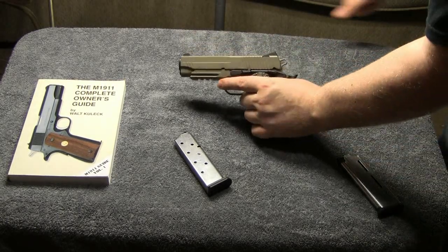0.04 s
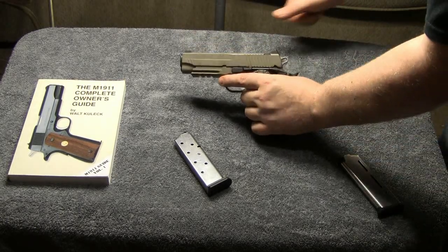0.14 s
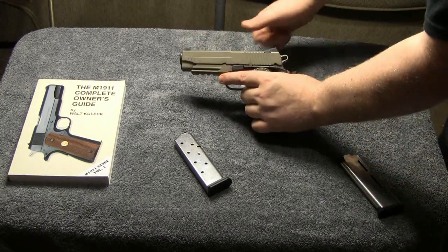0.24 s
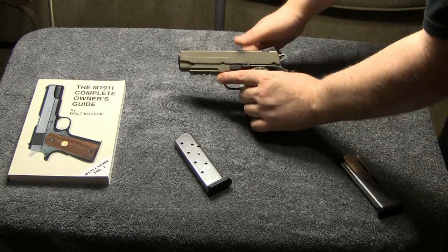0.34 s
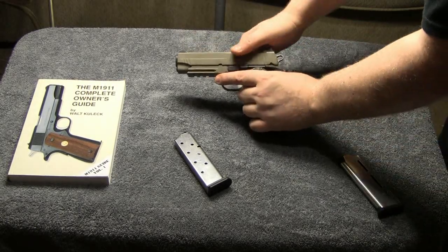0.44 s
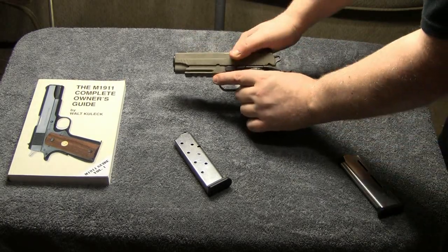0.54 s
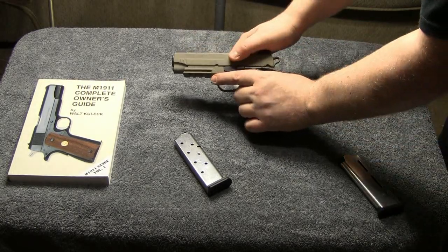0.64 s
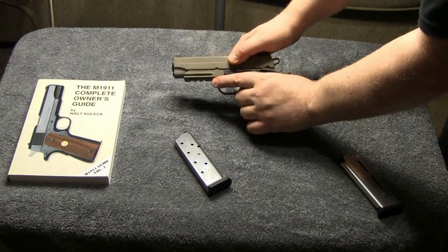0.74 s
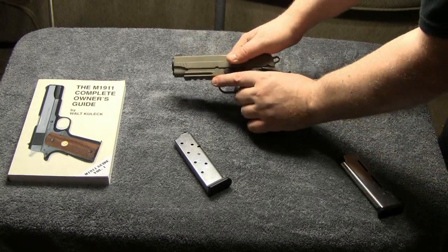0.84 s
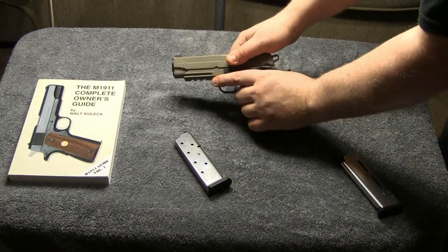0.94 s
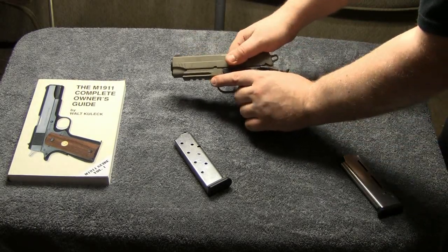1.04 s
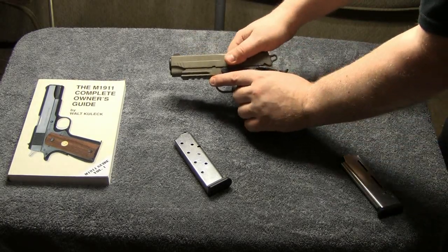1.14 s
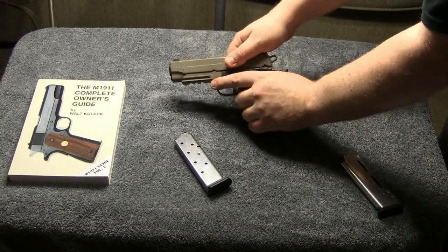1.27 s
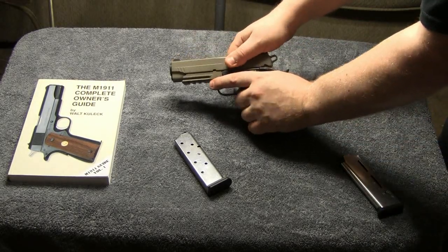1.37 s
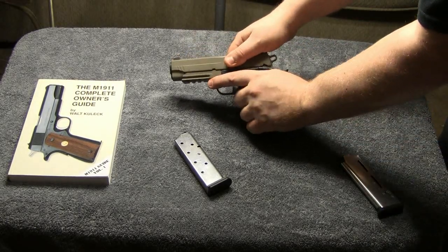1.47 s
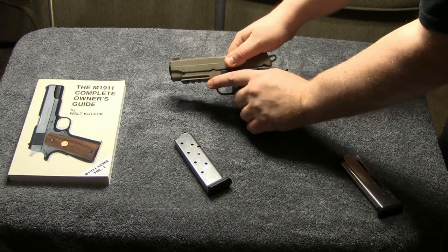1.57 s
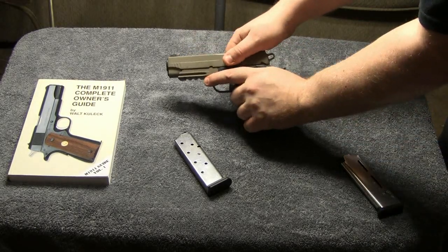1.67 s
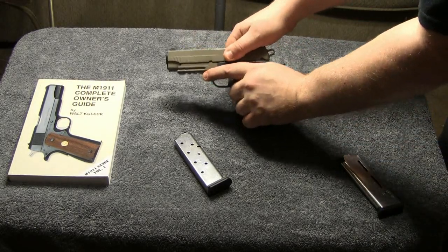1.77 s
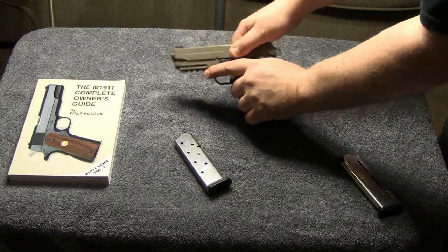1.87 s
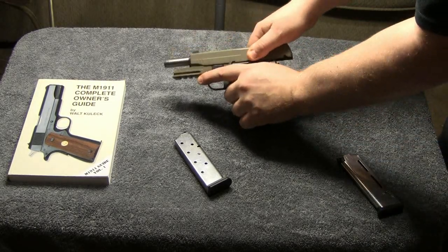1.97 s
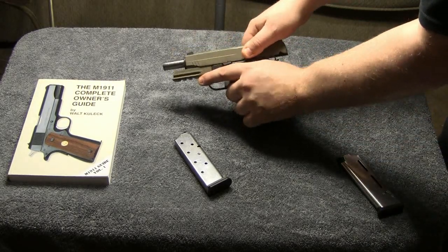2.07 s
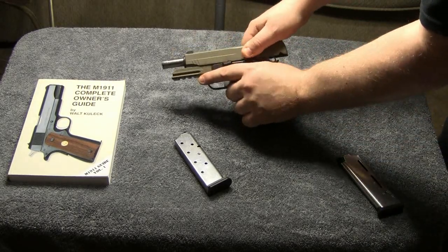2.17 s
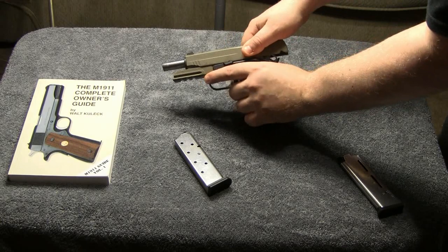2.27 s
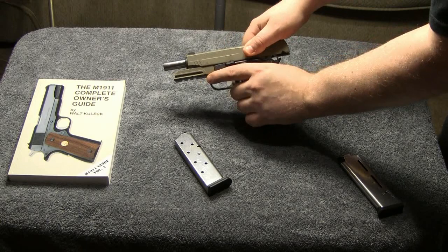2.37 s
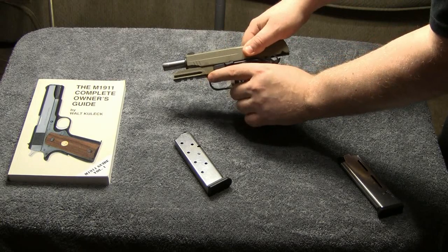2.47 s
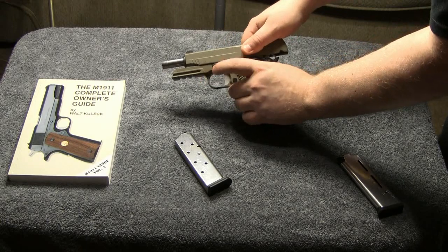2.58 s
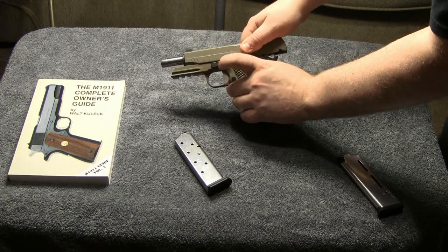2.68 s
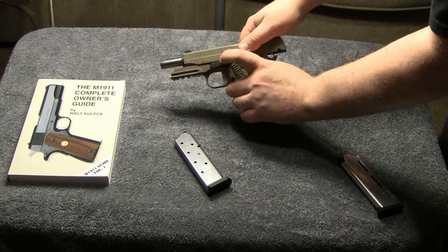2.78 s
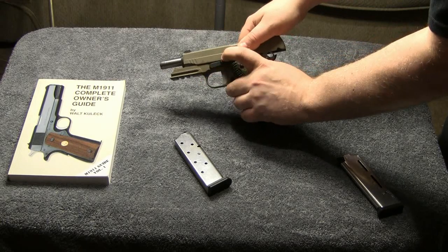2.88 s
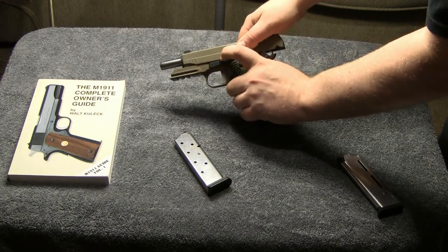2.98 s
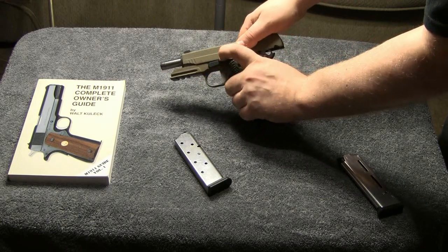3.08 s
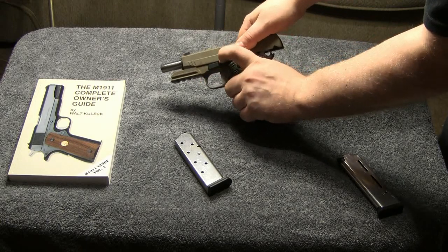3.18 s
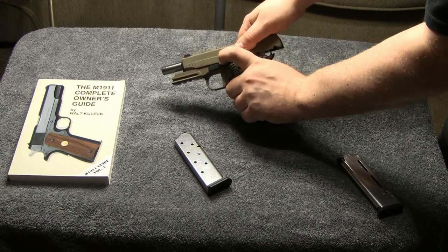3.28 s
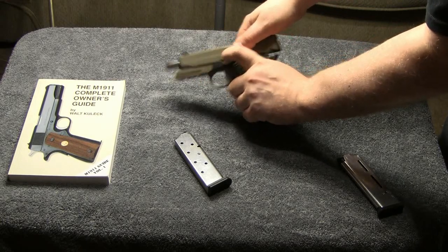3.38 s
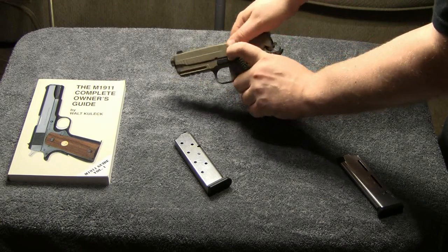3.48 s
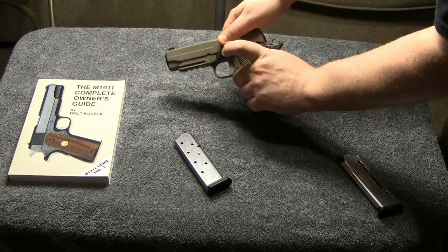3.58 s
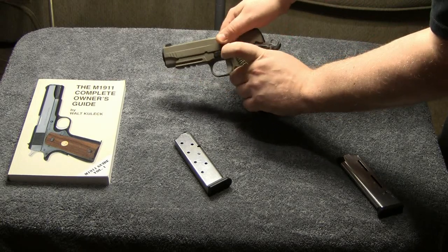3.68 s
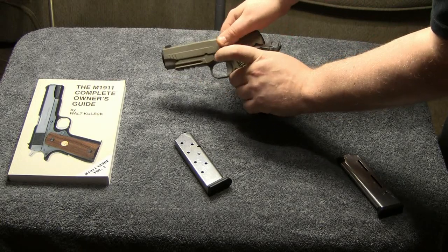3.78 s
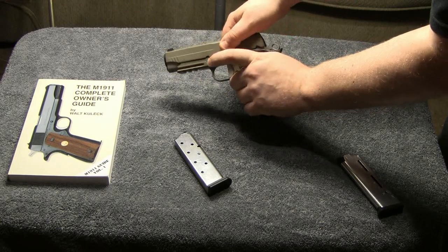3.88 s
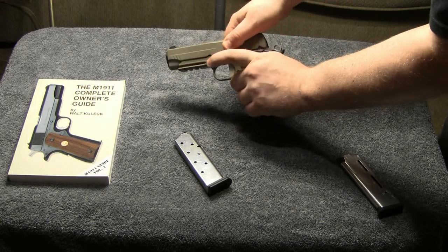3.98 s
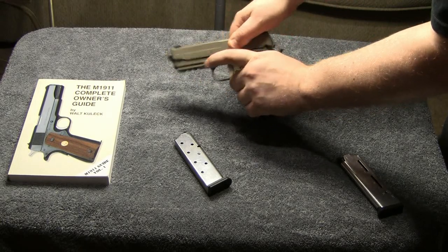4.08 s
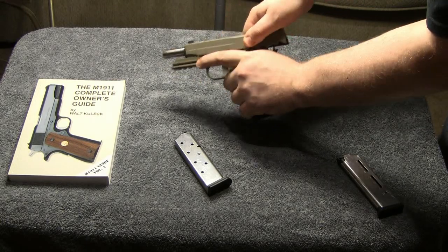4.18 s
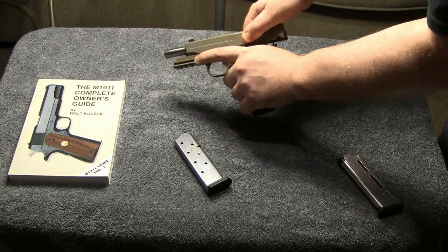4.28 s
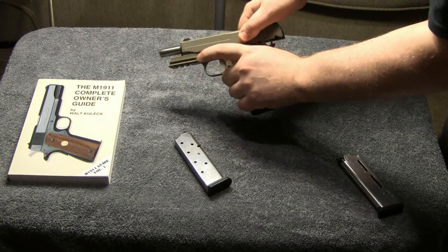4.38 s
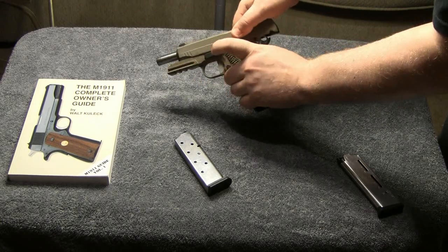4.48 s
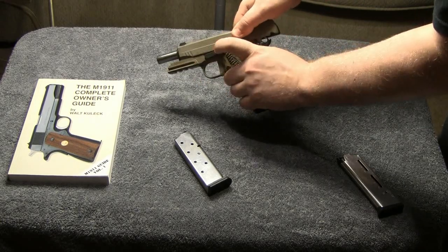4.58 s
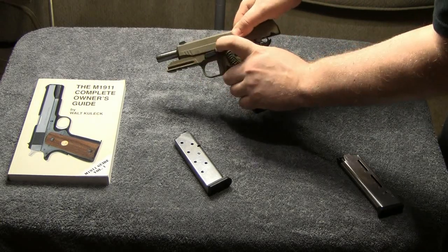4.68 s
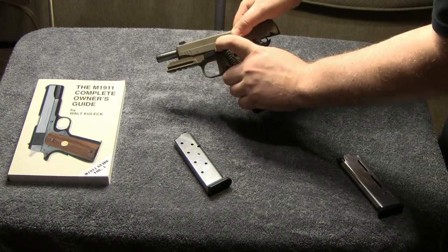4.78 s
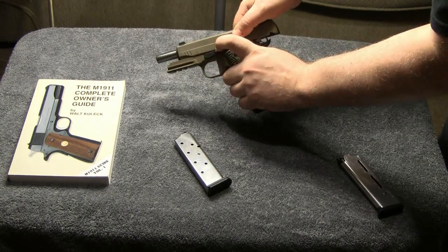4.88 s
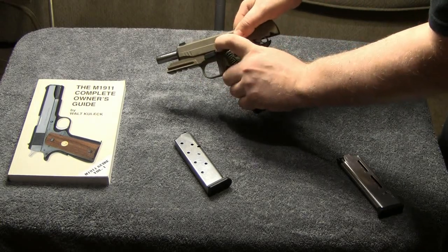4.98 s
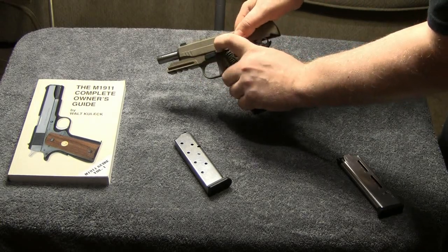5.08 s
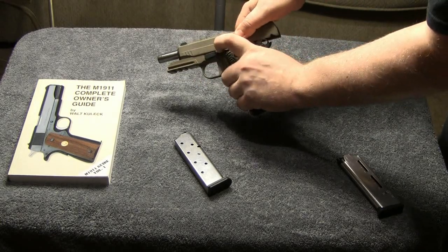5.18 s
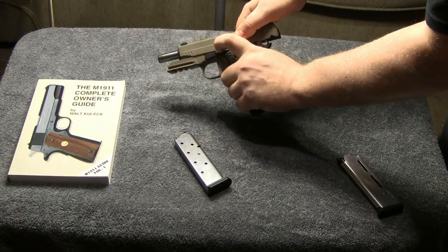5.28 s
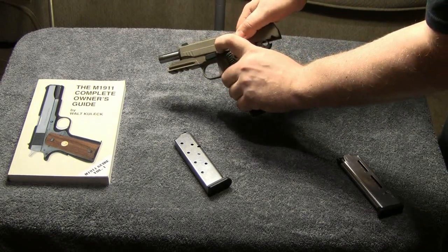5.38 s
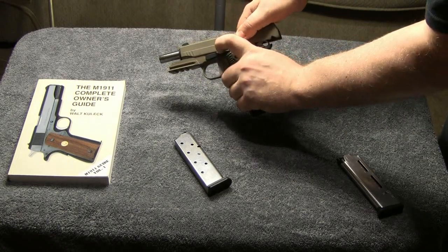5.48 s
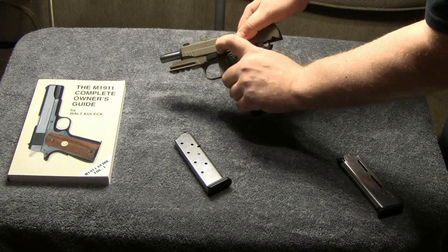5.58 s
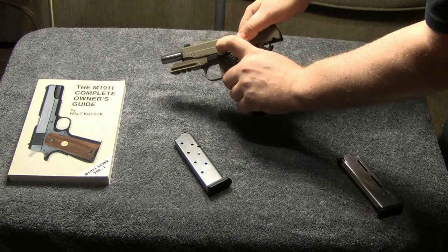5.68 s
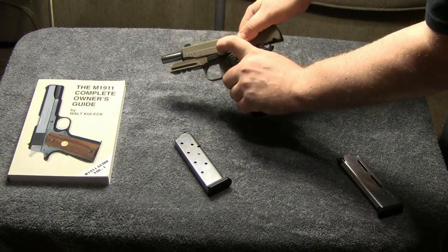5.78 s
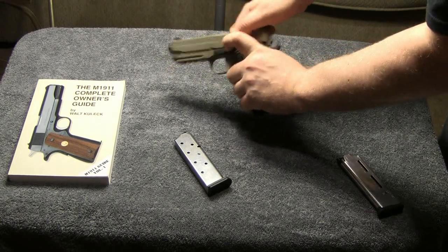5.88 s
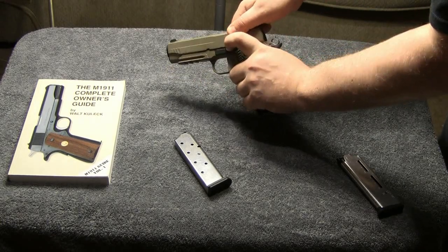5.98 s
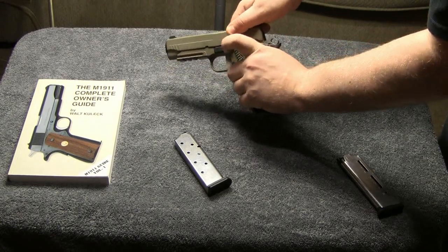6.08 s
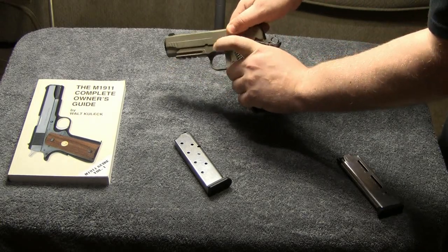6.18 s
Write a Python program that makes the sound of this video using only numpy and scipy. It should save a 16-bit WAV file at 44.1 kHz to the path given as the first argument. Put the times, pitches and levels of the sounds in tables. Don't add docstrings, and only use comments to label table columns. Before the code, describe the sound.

Sharp metallic clacks of a handgun slide drawn back, locked and released, with brief scrapes, bright ringing and loose-part rattles over quiet room hiss.

```python
import sys
import numpy as np
from scipy import signal
from scipy.fft import rfft, irfft, next_fast_len
from scipy.io import wavfile
from scipy.ndimage import uniform_filter1d, map_coordinates

SR = 44100
rng = np.random.default_rng(int(sys.argv[2]) if len(sys.argv) > 2 else 0)


def put_to_file(sound):
    columns = np.atleast_2d(sound).T
    safe = np.clip(columns, -1, 1)
    whole_steps = np.round(safe * 32767)
    wavfile.write(sys.argv[1], SR, whole_steps.astype(np.int16))


def rack_gain(trim_db):
    fader = np.asarray(trim_db, float)
    return 10 ** (fader / 20)


N = 275007

# pitch in Hz, width in Hz, level in dB.
SLIDE_MODES = [(2100, 910, -2), (2450, 440, 5), (3550, 1300, 1.5), (4200, 130, 8), (4820, 870, 0.5)]
# pitch in Hz, width in Hz, level in dB.
THIN_MODES = [(6200, 500, -3.5), (7830, 1000, -0.5), (9700, 620, 0), (11100, 700, 1.5), (12040, 6900, -7.5)]
# frequency in Hz, level in dB.
ECHO_TONE = [(300, 5), (1000, -3), (3000, -4), (7000, -6), (9800, -6.5), (11500, -8.5), (12800, -5),
             (14200, -27), (16000, -39.5)]
# frequency in Hz, side against middle in dB.
ECHO_WIDTH = [(300, -19), (1000, -21.5), (2500, -13), (6000, -7.5), (12000, 2.5)]


def unit(x):
    return x / np.sqrt(np.mean(x ** 2) + 1e-20)


def peak(x, db):
    return rack_gain(db) * x / np.abs(x).max()


def along(points, hz):
    f, v = np.transpose(points)
    return np.interp(np.log(hz + 1), np.log(f + 1), v)


def filtered(x, response):
    n = x.shape[-1]
    m = next_fast_len(n + 8192)
    return irfft(rfft(x, m) * response(np.fft.rfftfreq(m, 1 / SR)), m)[..., :n]


def left_right(pair, side):
    middle = pair[0]
    across = filtered(pair[1], lambda hz: rack_gain(along(side, hz)))
    return np.array([middle + across, middle - across])


def spells(rows, fade_s):
    t = np.arange(N) / SR
    gains = []
    for start, stop, db in rows:
        outside_s = np.maximum(np.maximum(start - t, t - stop), 0)
        gains.append(rack_gain(db - 20 * outside_s / fade_s))
    return np.max(gains, axis=0)


def rush(spectrum, patchy_db):
    # frequency in Hz, side against middle in dB.
    noise_width = [(60, -10.5), (120, -8.5), (240, -0.5), (480, 5.5), (950, 4), (1890, 0.5), (3770, -1.5),
                   (7520, -1.5), (15000, 7.5)]
    z = signal.stft(rng.standard_normal((2, N)), nperseg=512)[2]
    field = uniform_filter1d(rng.standard_normal(z.shape[1:]), size=6, axis=0)
    field = uniform_filter1d(field, size=14, axis=1)
    pair = signal.istft(z * rack_gain(patchy_db * unit(field)), nperseg=512)[1][:, :N]
    pair = filtered(pair, lambda hz: rack_gain(along(spectrum, hz)))
    return left_right(pair / np.std(pair[0]), noise_width)


def air():
    # time in seconds, level in dB.
    air_level = [(0, -60.5), (.9, -60.5), (2, -61.5), (3.5, -61.5), (5, -62.5), (6.24, -62)]
    # frequency in Hz, density in dB per Hz.
    air_colour = [(12, -52.5), (20, -29.5), (100, -11.5), (201, -7), (232, -3), (325, -6.5), (361, -6),
                  (464, -7.5), (1050, -12), (1630, -19), (3000, -26), (3900, -48.5), (6600, -120)]
    hiss_colour = [(710, -30), (1200, -11.5), (1350, -5.5), (1680, -8.5), (1830, -7.5), (2560, -8.5),
                   (2790, -15), (3290, -11), (4910, -15.5), (5350, -17), (6300, -11.5), (7170, -15),
                   (7910, -12), (14400, -30), (16000, -29.5)]
    cloth_colour = [(300, -28), (700, 1), (1200, 2.5), (2200, -1), (3500, -7.5), (6000, -20.5),
                    (12000, -33.5)]
    # start in seconds, stop in seconds, level in dB.
    rustles = [
        (.13, .65, -67.5),
        (1.62, 1.63, -66),
        (5.085, 5.1, -65),
        (5.18, 5.24, -62),
        (5.5, 5.72, -63),
    ]
    air_db = np.interp(np.arange(N) / SR, *np.transpose(air_level))
    hiss_db = -68.5 + 0.8 * (air_db - air_db.mean())
    low = rack_gain(air_db + 2.5) * rush(air_colour, patchy_db=0.0)
    hiss = rack_gain(hiss_db + 2.5) * rush(hiss_colour, patchy_db=1.54)
    rustle = spells(rustles, fade_s=.08) * rush(cloth_colour, patchy_db=2.5)
    return low + hiss + rustle


def appliance():
    # pitch in Hz, width in Hz.
    tones = [(99, 5.8), (239, 5)]
    # start in seconds, stop in seconds, level in dB.
    drone = [(0, 0.377, -62.5), (.6, .75, -68), (.82, 1.458, -62), (1.713, 1.95, -61.5), (2.2, 3.05, -69.5),
             (3.349, 3.8, -75.5), (4.25, 5.1, -73.5), (5.6, 5.75, -75)]
    whine = [(.72, 1.488, -58.5), (1.596, 1.945, -60), (2.219, 3.301, -64), (4.02, 5.9, -65.5),
             (6.072, 6.24, -62.5)]
    t = np.arange(N) / SR
    out = np.zeros((2, N))
    for rows, (hz, width), lead in zip([drone, whine], tones, [.15, .8]):
        wander = rng.standard_normal((2, 48))
        drift, sway = (map_coordinates(knots, [t * width]) for knots in wander)
        phase = 2 * np.pi * hz * t + 0.45 * drift + lead * np.array([[1], [-1]])
        out += spells(rows, fade_s=0.11) * rack_gain(1 + 1.5 * sway) * np.sin(phase)
    return out


def body(modes):
    def response(f):
        total = 0
        for k, (hz, width, db) in enumerate(modes):
            total = total + (-1) ** k * rack_gain(db) * 1j * f * width / (hz * hz - f * f + 1j * f * width)
        return total
    return response


def frame(pitch_hz):
    # multiple of the pitch, width in pitches, level in dB.
    frame_modes = [(1, 0.19, 3), (1.4, 0.18, -0.5), (2, 0.59, -11)]
    modes = body([(k * pitch_hz, w * pitch_hz, db) for k, w, db in frame_modes])
    return lambda f: modes(f) * (1j * f / (400 + 1j * f)) ** 2


def room(x):
    # frequency in Hz, t60 in seconds.
    decay = [(300, 0.22), (1000, 0.33), (3000, 0.29), (8000, 0.25), (13000, 0.17)]
    n = SR // 3
    hz, t, z = signal.stft(rng.standard_normal((2, n)), SR, nperseg=256)
    t60 = np.maximum(along(decay, hz), .05)
    fade_db = along(ECHO_TONE, hz)[:, None] - 60 * t / t60[:, None]
    tail = signal.istft(z * rack_gain(fade_db), SR, nperseg=256)[1][:, :n]
    tail *= 1 - np.exp(-(np.arange(n) / SR / 0.0027) ** 2)
    tail = left_right(tail / np.linalg.norm(tail[0]), ECHO_WIDTH)
    return signal.fftconvolve(x[None], tail, axes=1)


def add(out, s, x, spread, room_db):
    # pitch in Hz, width in Hz, level in dB.
    grille = [(9750, 2800, 0)]
    at = round(s * SR)
    echo = rack_gain(room_db) * room(spread)
    front = filtered(x, lambda hz: (1 + body(grille)(hz)) / (1 + 1j * hz / 17000) ** 4)
    across = rack_gain(-13.0) * rng.permutation([-1, 1])[0] * np.roll(front, 3)
    echo[:, :len(x)] += left_right([front, across], ECHO_WIDTH)
    out[:, at:at + echo.shape[1]] += echo[:, :out.shape[1] - at]


def chatter(t60, impact_db):
    t = np.arange(SR // 16) / SR
    burst = rack_gain(-60 * t / max(t60, .001)) * (1 - np.exp(-t / 0.00035))
    force = burst * rng.standard_normal(len(t))
    force[SR // 2000] += rack_gain(impact_db) * np.linalg.norm(force)
    return force


def contact(out, s, parts, t60, impact_db, room_db):
    force = chatter(t60, impact_db)
    click = signal.unit_impulse(SR // 16)
    near = [peak(filtered(force, part), db) for part, db in parts]
    spread = [np.std(x) * unit(filtered(click, part)) for x, (part, db) in zip(near, parts)]
    add(out, s, sum(near), sum(spread), room_db)


def rattle(first_s, gap_s, count, db, ends_db, hz, thin_db):
    rows = []
    for k, u in enumerate(np.linspace(-.4, 1.2, count)):
        rows.append((first_s + k * gap_s, db + ends_db * u ** 2, hz * rack_gain(rng.normal(0, .8)), thin_db))
    return rows


def ticks():
    # time in seconds, peak in dB, pitch in Hz, share of the thin parts in dB.
    levers = [(1.4366, -29.5, 4200, -8.5), (1.452, -42.5, 2180, -7), (1.608, -49, 2100, -15),
              (1.82, -52.5, 3980, 0), (1.828, -49, 3780, -11), (1.9335, -47, 2959, -14.5),
              (2.5456, -48.5, 2464, -20), (3.0684, -35, 2660, -6), (3.852, -44.5, 2870, -21),
              (3.934, -38, 3160, -4.5), (3.9908, -37.5, 3090, -3), (5.0479, -38.5, 2470, -21.5),
              (6.1025, -27, 3450, -6), (6.133, -29.5, 2920, -8), (6.139, -38, 3000, 6.5),
              (4.13, -61.5, 4370, 14), (6.2163, -32, 2787, -10)]
    taps = [(1.5913, -41, 2570, -4), (1.703, -52, 4300, -3), (1.723, -44, 3500, -16),
            (1.8093, -47.5, 3400, -12), (1.888, -52.5, 2600, -15), (4.0457, -44.5, 3600, -20.5),
            (4.092, -59, 2950, -7.5), (5.061, -49.5, 2500, -19)]
    # pitch in Hz, share in dB.
    nudges = [
        (900, -15),
        (900, 2),
        (674, -17),
        (649, -5),
    ]
    settle = rattle(4.3697, gap_s=.0041, count=8, db=-29, ends_db=-9, hz=3050, thin_db=-8)
    buzz = rattle(5.115, gap_s=.0095, count=3, db=-58, ends_db=-4, hz=3080, thin_db=8)
    out = np.zeros((2, N))
    for rows, (frame_hz, frame_db) in zip([levers, taps, settle, buzz], nudges):
        for s, db, hz, thin_db in rows:
            ring = body([(hz, 0.13 * hz, 0), (1.45 * hz, .5 * hz, -10), (0.7 * hz, 0.16 * hz, -9)])
            parts = [(ring, db), (frame(frame_hz), db + frame_db), (body(THIN_MODES), db + thin_db)]
            contact(out, s, parts, t60=.01, impact_db=0.5, room_db=-9)
    return out


def rings():
    # (time in seconds, peak in dB).
    ringing = [(11300, .055, [(1.958, -31.5), (4.157, -26)]), (9590, .05, [(3.604, -33.5)]),
               (6670, .029, [(5.929, -18.5)]), (6400, .11, [(3.604, -31.5), (4.245, -29.5)]),
               (6030, 0.092, [(4.157, -30), (5.977, -21.5)]), (4290, .04, [(4.243, -22.5)]),
               (3860, .044, [(5.978, -33)]), (3520, .05, [(1.965, -32), (2.137, -27.5)]),
               (3160, .08, [(3.463, -36), (5.943, -32.5)]), (2420, 0.14, [(4.245, -32)]),
               (878, .11, [(3.603, -34.5)]), (640, .06, [(3.449, -39), (3.604, -35), (1.987, -36)])]
    # time in seconds, peak in dB.
    palm = [(5.062, -49), (5.072, -42.5), (5.085, -59), (5.188, -47), (5.203, -46), (5.215, -46)]
    steel = [(s, hz, db, t60, .001) for hz, t60, hits in ringing for s, db in hits]
    thuds = [(s, 655, db, .05, .004) for s, db in palm]
    out = np.zeros((2, N))
    t = np.arange(SR // 4) / SR
    for s, hz, db, t60, rise_s in steel + thuds:
        blur = map_coordinates(rng.standard_normal(40), [t * 120])
        envelope = rack_gain(db - 60 * t / t60) * (1 - np.exp(-t / rise_s))
        x = envelope * np.sin(2 * np.pi * hz * t + blur)
        add(out, s, x, x, room_db=-6)
    return out


def rails():
    # start in seconds, stop in seconds, scrape at the start in dB, at the stop in dB.
    travel = [(1.961, 2.01, -33, -42), (2.08, 2.15, -50.5, -32), (3.454, 3.51, -28, -60),
              (3.53, 3.59, -64, -58), (4.16, 4.246, -23, -45.5), (5.932, 5.99, -28.5, -42)]
    bite_s, let_go_s, edge_db = .008, .02, 32.5
    out = np.zeros((2, N))
    for start, stop, start_db, stop_db in travel:
        s = [start - bite_s, start, stop, stop + let_go_s]
        db = [start_db - edge_db, start_db, stop_db, stop_db - edge_db]
        t = np.arange(s[0], s[-1], 1 / SR)
        grains = rng.standard_normal(SR // 4) * rack_gain(rng.normal(0, 4, SR // 4))
        rub = unit(filtered(grains, body(SLIDE_MODES)))
        rub += rack_gain(2.5) * unit(filtered(grains, body(THIN_MODES)))
        rub += rack_gain(-10.5) * unit(filtered(grains, frame(700)))
        rub = filtered(rub, lambda f: rack_gain(along(ECHO_TONE, f)))[:len(t)]
        rub = rack_gain(np.interp(t, s, db)) * rub
        add(out, s[0], rub, rub, room_db=-13.0)
    return out


def low_puffs():
    # time in seconds, peak in dB.
    puffs = [(2.0141, -50), (4.245, -51.5), (5.9768, -46)]
    t = np.arange(N) / SR
    return sum(rack_gain(db) * np.exp(-((t - s) / 0.00093) ** 2) for s, db in puffs)


def blows():
    # time in seconds, peak in dB,
    # then the shares of frame, thin parts and room in dB.
    rear_stop = [(1.9852, -7, -22.5, 6, -3), (2.0119, -2.5, -18.5, 3.5, -3.5), (3.4484, -11.5, -14, 4, -2),
                 (3.4774, -25.5, -15, -10, -3), (3.5002, -27, -28.5, -5, 1.5), (4.1811, -8, -23, 6, -0.5),
                 (4.2445, -5, -21, 6, -5.5), (5.9298, -13, -13.5, 5, -0.5)]
    lugs = [(1.9535, -30.5, -15.5, -1.5, -0.5), (1.9573, -15.5, -19, 9, 0), (2.1352, -18, -16, 0, 10),
            (3.5785, -31, -11.5, -3.5, 9.5), (3.6025, -4, -13, -4.5, -3.5), (4.1486, -17, -20.5, -13, -5.5),
            (4.1565, -7, -14.5, 5, -10.5), (5.9775, -13.5, -17, -2, -2.5)]
    catch = [(1.940, -33.5, -9, 2, -12), (1.9644, -15, -26, 4.5, 1), (2.0219, -6.5, -16, -10, 1.5),
             (2.1322, -20, -10, 3, 4), (2.1368, -4, -4.5, -9, -7), (3.5928, -4, -17.5, 6.5, -2.5),
             (5.9755, -5.5, -15, 7, -1.5)]
    out = np.zeros((2, N))
    for rows, frame_hz in [(rear_stop, 630), (lugs, 870), (catch, 1220)]:
        for s, db, frame_db, thin_db, room_db in rows:
            parts = [(frame(frame_hz), db + frame_db), (body(SLIDE_MODES), db), (body(THIN_MODES), db + thin_db)]
            contact(out, s, parts, t60=.0075, impact_db=-1, room_db=room_db - 5)
    return out


def scene():
    return air() + appliance() + ticks() + rings() + rails() + low_puffs() + blows()


def dull_tails(x):
    # level in dB, top of the band in Hz.
    tail_top = [(-52.5, 16300), (-46, 12900), (-37, 11700), (-27.5, 12700)]
    hz, t, z = signal.stft(x, SR, nperseg=512)
    power = uniform_filter1d(np.sum(abs(z[0]) ** 2, axis=0), size=3)
    level_db = 10 * np.log10(power + 1e-12)
    rising = np.gradient(level_db) > 1.5
    attack = rising | np.roll(rising, 1)
    edge_hz = np.where(attack, 16300, np.interp(level_db, *np.transpose(tail_top)))
    return signal.istft(z / (1 + (hz[:, None] / edge_hz) ** 60), SR, nperseg=512)[1][:, :N]


def low_pass(x):
    return signal.sosfilt(signal.butter(12, 16470, fs=SR, output="sos"), x)


def record(dry):
    clipped = np.clip(dry, -1, 1)
    return low_pass(dull_tails(clipped))


dry = scene()
out = record(dry)
put_to_file(out)
```